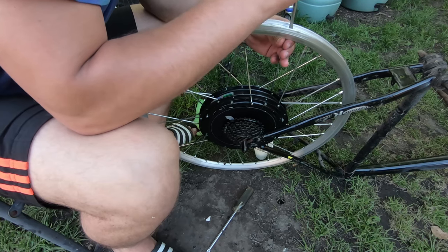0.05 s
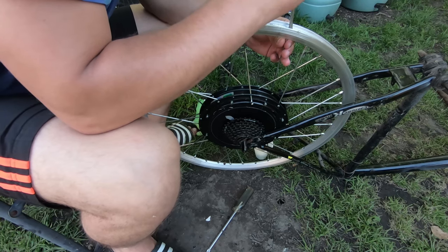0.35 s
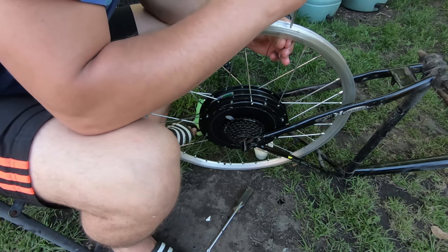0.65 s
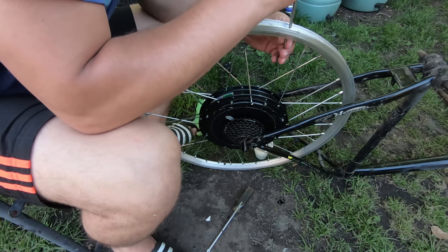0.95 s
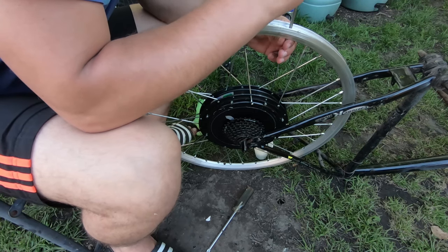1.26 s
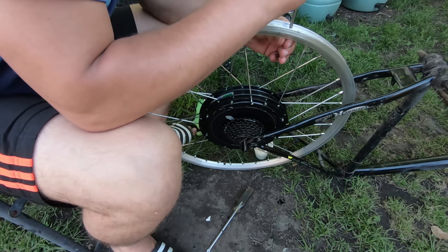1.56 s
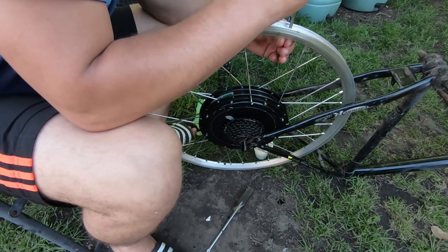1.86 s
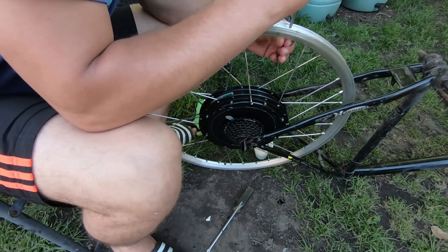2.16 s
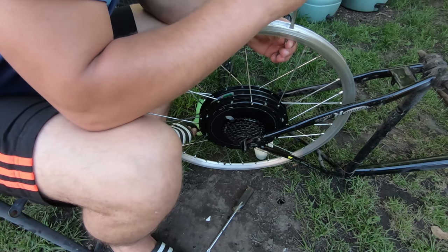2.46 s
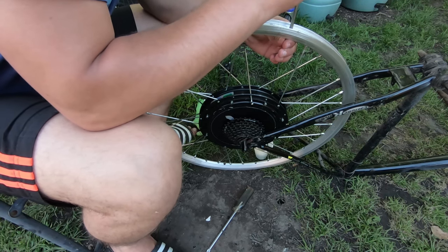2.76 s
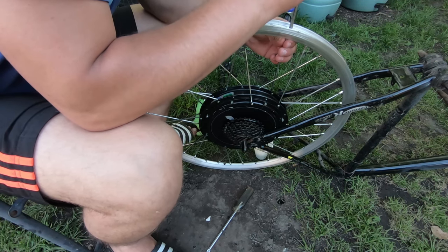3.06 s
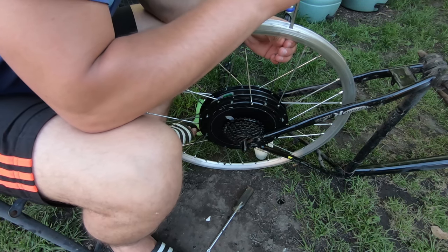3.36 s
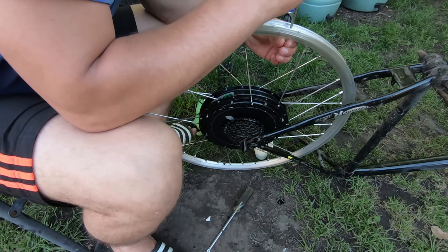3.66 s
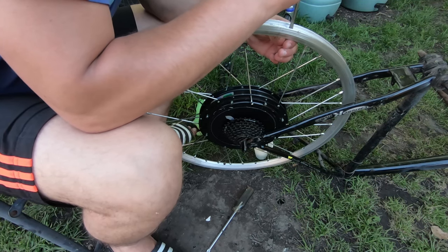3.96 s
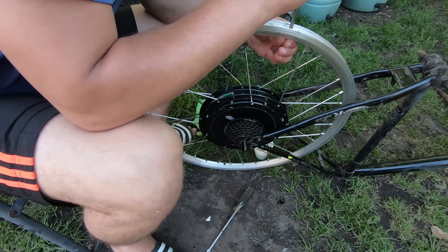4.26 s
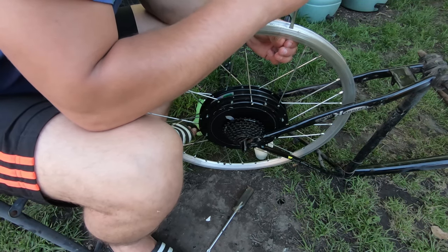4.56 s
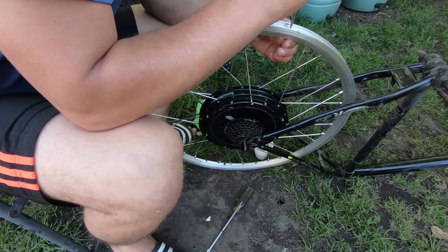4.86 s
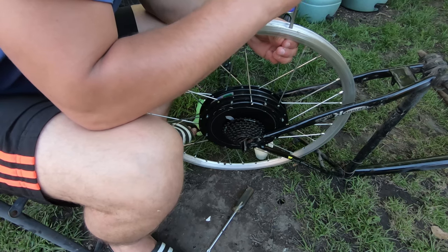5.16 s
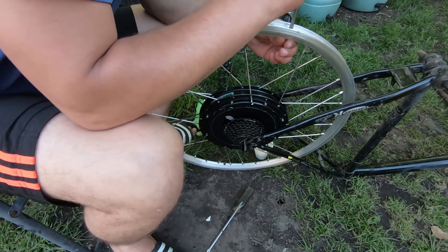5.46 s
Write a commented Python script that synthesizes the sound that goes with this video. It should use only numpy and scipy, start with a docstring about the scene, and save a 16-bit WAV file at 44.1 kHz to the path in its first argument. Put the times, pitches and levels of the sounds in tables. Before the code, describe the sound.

A low wind rumble runs throughout in a quiet garden, with soft buffets on the microphone, mostly in the first second and after 3 seconds, over very faint air hiss. A tool slips on a metal bicycle rim, giving light, irregular clicks that ring briefly, some paired with a tiny scrape between them. They fall around 0, 0.5, 0.9, 1.6 and 2.5 seconds. At 2.6 seconds comes one sharp, much louder snap with pinging spokes. Light clicks continue around 2.9, 3.3, 3.8, 4.4, 4.7 and 5.4 seconds. A nearby small bird gives three high, slightly falling whistles between 1 and 1.6 seconds, while another chirps faintly and raspily further off throughout. On the left a pigeon coos softly from 1.5 to 2.3 seconds, at 3.8, and from 4.6 to 5.4, answered by a fainter, lower one. A faint low hum swells and fades around 2 seconds.

```python
"""Bicycle wheel in a garden

A tool slips on the rim of a bicycle wheel: each slip excites the damped modes of rim and spokes as a
click, and between close clicks friction makes a rub. A small bird whistles nearby, another chirps further
off, and two pigeons coo to the left; their calls are frequency-modulated tones with garden echoes.
Under it all lie a low rumble with soft buffets of wind, a brief faint hum and the hiss of the air."""
import sys
import numpy as np
from scipy import signal
from scipy.fft import rfft, irfft, next_fast_len
from scipy.io import wavfile
from scipy.ndimage import uniform_filter1d

SR = 44100
rng = np.random.default_rng(int(sys.argv[2]) if len(sys.argv) > 2 else 0)


def digitize_waveform(pressure):
    """Quantize a signal to 16-bit integers and store it at the path in sys.argv[1].

    Rows of a 2-D input are taken as channels; values are limited to [-1, 1].
    """
    field = np.atleast_2d(pressure).T
    bounded = np.clip(field, -1, 1)
    quanta = np.round(bounded * 32767).astype(np.int16)
    wavfile.write(sys.argv[1], SR, quanta)


N = 242991
T = np.arange(N) / SR

# Levels in the tables are relative; each source applies its own gain.
# slips at the rim: (time [s], level [dB], treble [dB], rim ring boost [dB], middle ping boost [dB])
CLICKS = [(0.0024, -33.5, 8, 0, 2), (0.054, -49.5, -33.5, -20.5, 1.5), (0.4914, -36.5, -30, 2.5, 1),
          (0.5576, -32.5, -14, -0.5, 3.5), (0.839, -37, -21, -8, -0.5), (0.8924, -40.5, -42.5, -33, -12),
          (0.9189, -45.5, -32, 1, 2.5), (1.6172, -30, -15.5, -9.5, -1), (1.6612, -44, -40, -32, -7.5),
          (2.4693, -34, -42, -6.5, -1.5), (2.6289, -11, -7.5, -2, 0), (2.8827, -39.5, -26.5, -4, 2),
          (3.293, -33.5, -14.5, -2.5, 0), (3.776, -47.5, -48.5, -31, -3), (3.8186, -40, -34.5, -3.5, 0.5),
          (3.98, -48, -36, -16.5, -6.5), (4.333, -42.5, -55.5, -4.5, 8), (4.3678, -33, -31, -1, -4),
          (4.6045, -36, -17.5, -7.5, -1), (4.693, -52, -40, -15, -6), (4.7433, -33.5, -32, -2, 2),
          (5.1074, -42.5, -36, -20, -2.5), (5.4036, -35.5, -22, 4.5, 4.5), (5.442, -32, -20.5, 1, 1)]
# free modes of rim and spokes: (frequency [Hz], level [dB], time to decay by 60 dB [s])
WHEEL_MODES = [(810, -3, .15), (1265, 4.5, .08), (1390, -10, .06), (1810, 0, .09), (2024, -10, .06),
               (2335, -4, .09), (2437, -5, .08), (2730, -12, .08), (2918, -2, .12), (2968, -1, .09),
               (3440, -10, .13), (4068, -3, .18), (4656, -2, .12), (5292, -2, .15), (5890, -10, .2),
               (6525, -7, .13), (7300, -9, .15), (9105, -20, .08)]
# dense, quickly dying part of a click: (frequency [Hz], spectral level [dB])
CRACK_SPECTRUM = [(300, -30), (980, -27), (1300, 0), (2800, -1), (3700, -1), (5000, 3), (7400, 2.5),
                  (8400, -13), (10200, -15), (15000, -22)]
# the tool catching just before a slip: (time [s], level [dB])
CATCHES = [(0.49, -58), (0.5545, -51), (0.833, -62), (1.6135, -52), (3.287, -49.5), (5.4026, -47)]
# bird notes: kind -> (length [s], end pitch [ratio], glide exponent [1], opening scoop [share of pitch])
NOTE_SHAPES = {"whistle": (.1, .89, 1.2, .08), "rising coo": (.158, 1.075, 1.1, 0),
               "falling coo": (.235, .87, 3.2, 0), "lead-in": (0.073, 1.06, 0.96, 0.028),
               "short coo": (.085, .87, 1.1, .01), "far coo": (.2, .93, 1.2, 0.022)}
# near bird: (time [s], pitch [Hz], level [dB])
WHISTLES = [(1.004, 5580, -42.5), (1.244, 4600, -39), (1.47, 4570, -47.5)]
# far bird: (time [s], kind, level [dB])
CHIRPS = [(0.217, "high", -60), (0.999, "high", -62.5), (1.199, "low", -69.5), (1.927, "high", -64.5),
          (2.276, "low", -62.5), (2.953, "high", -65.5), (3.1, "low", -68), (3.539, "low", -77),
          (3.729, "high", -60.5), (4.361, "low", -64.5), (4.606, "high", -63.5), (4.64, "low", -64.5)]
# its high and low chirp: kind -> (opening pitch [Hz], centre of the rasp [Hz])
CHIRP_PITCHES = {"high": (5130, 4520), "low": (4020, 3750)}
# near pigeon: (time [s], kind, pitch [Hz], level [dB])
NEAR_COOS = [(1.525, "lead-in", 478.6, -59), (1.603, "short coo", 488, -42.5),
             (1.935, "rising coo", 480, -47.5), (2.075, "falling coo", 488, -47),
             (3.79, "short coo", 504, -50), (4.565, "lead-in", 515.6, -52),
             (4.655, "short coo", 532.6, -48), (4.968, "rising coo", 475, -46),
             (5.122, "falling coo", 497.2, -47)]
# far pigeon: (time [s], level [dB])
FAR_COOS = [(0.879, -65), (1.148, -60.5), (2.249, -63), (2.678, -61.5), (3.459, -58), (3.919, -61)]
# strength of the breeze: (time [s], deep rumble level [dB], upper rumble level [dB])
BREEZE = [(0, -38, -46), (.6, -39, -49), (.78, -45, -51), (1.08, -42, -46), (1.24, -45, -54),
          (1.42, -40, -54), (1.7, -44, -55), (2.25, -40, -51), (2.43, -49, -59), (2.72, -41, -51),
          (3.12, -46, -56), (3.3, -41, -47), (3.88, -49, -59), (4.15, -41, -46), (4.45, -42, -46),
          (4.56, -44, -52), (4.9, -46, -52), (5.25, -40, -50)]
# strongest wind buffets: (time [s], level [dB])
BUFFETS = [(0.223, -33.5), (0.459, -31.5), (.55, -36), (0.699, -28.5), (0.919, -30.5), (1.054, -32),
           (1.118, -31.5), (2.194, -31), (3.052, -35.5), (3.241, -31.5), (3.469, -33), (4.112, -31),
           (4.459, -27.5), (4.744, -27.5), (5.35, -31)]
# deep wind rumble: (frequency [Hz], spectral level [dB])
DEEP_SPECTRUM = [(15, -4), (28, 10.5), (50, 19.5), (65, 16), (90, 17), (115, 3.5), (160, -79)]
# upper wind rumble: (frequency [Hz], spectral level [dB])
UPPER_SPECTRUM = [(80, -33.5), (115, 0), (170, -2), (205, -11), (240, -22), (320, -28), (700, -75.5)]
# still garden air: (frequency [Hz], spectral level [dB])
AIR_SPECTRUM = [(400, 0), (600, -7), (1400, -13), (2500, -21), (5000, -22), (6800, -19), (8200, -29),
                (15000, -44)]

MODE_SCATTER_DB = 1.9   # each point of contact favours other modes


def wheel(level_db=-18, echo_db=-5.5):
    """Stick-slip friction: rubs, catches and clicks add to their reflections from paving and fence."""
    out = rubbing(wheel_spectrum(rim_db=-3, ping_db=4.5)) + catches()
    for s, click_db, *touch in CLICKS:
        sound, lead_s = click(click_db, *touch)
        early = max(round((lead_s - s) * SR), 0)
        add(out, s - lead_s, from_db(click_db + level_db) * sound[:, early:])
    return out + from_db(echo_db) * garden_echoes(out, t60=.2, alike=.14, delay_s=.016)


def click(level_db, treble_db, rim_db, ping_db, lead_s=.008, usual_slip_s=.0042, snap_db=-22):
    """Impulse excitation: the metal scrapes, slips in a gritty burst and rings in damped modes."""
    t = T[:SR // 4] - lead_s
    after = np.maximum(t, 0)
    slip_s = usual_slip_s * 2 ** ((-39.5 - level_db) / 33.5)   # lighter touches drag on longer
    hz, mode_db, t60 = np.transpose(WHEEL_MODES)[:, :, None]
    phase = rng.uniform(0, 2 * np.pi, hz.shape) + .88 * rng.standard_normal((2, *hz.shape))
    spectrum = wheel_spectrum(rim_db, ping_db)
    scatter_db = MODE_SCATTER_DB * rng.standard_normal(hz.shape)
    strength = from_db(mode_db + contact_db(hz, rim_db, ping_db) + scatter_db)
    # hand and tool damp the treble most; only a hard snap shakes the spokes free
    loss_db_per_s = 60 / t60 + (level_db < snap_db) * .1 * hz
    modes = strength * from_db(-loss_db_per_s * after) * np.sin(2 * np.pi * hz * t + phase)
    crack = from_db(-60 * after / .1) * noise(spectrum, alike=.21, size=len(t))
    build_up = np.minimum(after / slip_s, 1)   # the ringing grows while the slip lasts
    slip = after / slip_s * np.exp(1 - after / slip_s)
    scrape = from_db(-9) * (slip_s / usual_slip_s) ** 2 * (t < 0) * (1 + t / lead_s)
    grit = from_db(3.1 * drift(1200, size=len(t))) * noise(spectrum, alike=.76, size=len(t))
    burst = from_db(3) * usual_slip_s / slip_s * (slip + scrape) * grit   # quicker slips are sharper
    return soften(build_up * (modes.sum(axis=1) + crack) + burst, treble_db), lead_s


def soften(sound, treble_db, hard_hz=15000, db_per_octave=18.5):
    """Band limiting: a soft contact excites little treble, and thin metal radiates little bass."""
    sound = butter(sound, hard_hz * 2 ** (treble_db / db_per_octave), "low", order=4)
    sound = butter(sound, 1080, "high", order=4)
    return sound / np.std(sound[:, :SR // 40])   # rms 1 over the first 25 ms


def wheel_spectrum(rim_db, ping_db, width_hz=40):
    """Resonance: the wheel's strong modes stand as peaks above a dense bed of weaker ones."""
    hz = np.geomspace(300, 15000, 1500)
    mode_hz, mode_db, _ = np.transpose(WHEEL_MODES)[:, :, None]
    mode_db = mode_db + MODE_SCATTER_DB * rng.standard_normal(mode_db.shape)
    peaks = np.sum(from_db(mode_db) ** 2 / (1 + (2 * (hz - mode_hz) / width_hz) ** 2), axis=0)
    bed = from_db(np.interp(hz, *np.transpose(CRACK_SPECTRUM)) - 15) ** 2
    power = peaks * np.minimum(hz / 1200, 1) ** 4 + bed
    return np.column_stack([hz, 10 * np.log10(power) + contact_db(hz, rim_db, ping_db)])


def contact_db(hz, rim_db, ping_db, rim_below_hz=1960, ping_hz=3230):
    """Modal coupling: where the tool bears sets the share of low rim ring and of middle ping."""
    return rim_db / (1 + (hz / rim_below_hz) ** 8) + ping_db / (1 + (5 * np.log(hz / ping_hz)) ** 4)


def rubbing(spectrum, level_db=-29.5, grain_db=5, dull_hz=4500, max_gap_s=.06, margin_s=.011):
    """Sliding friction: between close clicks the tool stays on the metal and drives it unevenly."""
    strokes = np.zeros(N)
    for (s, db, *_), (next_s, next_db, *_) in zip(CLICKS, CLICKS[1:]):
        if next_s - s < max_gap_s:
            firmness = from_db((db + next_db) / 2 + level_db)
            strokes += firmness * arch(s - margin_s, next_s - s + 2 * margin_s)
    grain = from_db(grain_db * drift(130))
    friction = butter(noise(spectrum, alike=.36), dull_hz, "low", order=4)
    return strokes * rms_one(grain * friction)


def catches(rise_s=.0013, band_hz=(2200, 8000)):
    """Weak transients: the tool catches in ticks too light and short to set the wheel ringing."""
    out, t = np.zeros((2, N)), T[:SR // 50]
    envelope = (t / rise_s * np.exp(1 - t / rise_s)) ** 2
    for s, db in CATCHES:
        tick = rms_one(butter(noise(CRACK_SPECTRUM, alike=.88, size=len(t)), band_hz, "band", order=3))
        add(out, s - rise_s, from_db(db) * tick * envelope)
    return out


def small_birds():
    """Direct and reflected sound: a near bird whistles, and a far one arrives mostly as echo."""
    notes = [(s, "whistle", hz, db) for s, hz, db in WHISTLES]
    near = song(notes, waver=.004, waver_hz=200, overtone_db=-40, softness=1.4, late=.8)
    far = chirps()
    near_echo = garden_echoes(near, t60=.32, alike=.59, delay_s=.0037)
    far_echo = garden_echoes(far, t60=.26, alike=.62, delay_s=.0027)
    return from_db(-9.5) * near + from_db(-4.5) * near_echo + from_db(-12) * far + far_echo


def song(notes, waver, waver_hz, overtone_db, softness, late):
    """Gliding oscillation: each nearly pure note swells and fades as its pitch grows less steady."""
    out, unsteady = np.zeros(N), waver * drift(waver_hz)
    for s, kind, pitch_hz, db in notes:
        length_s, glide, bend, scoop = NOTE_SHAPES[kind]
        progress = np.linspace(0, 1, round(length_s * SR))
        hz = pitch_hz * (1 + (glide - 1) * progress ** bend) * (1 - scoop * np.exp(-8 * progress))
        wobble = 1 + progress ** .41 * unsteady[round(s * SR):][:len(progress)]
        phase = 2 * np.pi * np.cumsum(hz * wobble) / SR
        swell = rms_one(np.abs(np.sin(np.pi * progress ** late)) ** softness)
        tone = np.sqrt(2) * (np.sin(phase) + from_db(overtone_db) * np.sin(2 * phase))
        add(out, s, from_db(db) * swell * tone)
    return out


def chirps(length_s=.18, hold_s=.022, break_s=.075, shake_hz=330, spread_hz=640):
    """Frequency modulation: a clear note drops into a rasp as its pitch shakes fast and wide."""
    out, t = np.zeros(N), T[:round(length_s * SR)]
    shake = np.tanh(drift(shake_hz))
    rasp = np.clip((t - hold_s) / break_s, 0, 1)
    swell = np.abs(np.sin(np.pi * (t / length_s) ** .65)) ** .8
    for s, kind, db in CHIRPS:
        opening_hz, centre_hz = CHIRP_PITCHES[kind]
        hz = opening_hz + rasp * (centre_hz - opening_hz + spread_hz * shake[round(s * SR):][:len(t)])
        add(out, s, from_db(db) * rms_one(swell * np.sin(2 * np.pi * np.cumsum(hz) / SR)))
    return out


def pigeons(near_db=-6.5, far_db=-6, echo_db=-6.5, far_hz=413.6):
    """Reverberation blurs the coos of two birds that answer each other across the gardens."""
    far_coos = [(s, "far coo", far_hz, db) for s, db in FAR_COOS]
    near = pigeon(NEAR_COOS, waver=.008, husk_db=-12, left_db=14.5, lag_s=.00012)
    far = pigeon(far_coos, waver=.06, husk_db=-19, left_db=13.5, lag_s=.0001)
    both = from_db(near_db) * near + from_db(far_db) * far
    return both + from_db(echo_db) * garden_echoes(both.mean(axis=0), t60=.6, alike=.94, delay_s=.027)


def pigeon(coos, waver, husk_db, left_db, lag_s, flutter_db=1.8):
    """Interaural differences: a wavering, husky hoot reaches the left ear sooner and louder."""
    hoot = song(coos, waver, waver_hz=30.4, overtone_db=-65.5, softness=1.2, late=.7)
    hoot *= from_db(flutter_db * drift(36))
    envelope = np.abs(signal.hilbert(hoot))
    husk = noise([(150, -36.5), (290, -16.5), (420, -1), (520, -10), (750, -31), (1500, -67.5)], .33)
    at_ears = np.array([hoot, np.interp(T - lag_s, T, hoot)])
    return pan(at_ears + from_db(husk_db) * envelope * husk, left_db)


def garden_echoes(x, t60, alike, delay_s):
    """Diffuse reflection: fences, walls and leaves return an exponentially decaying tail."""
    t = T[:SR]
    scatter = noise([(100, -14), (5000, -9), (15000, -.5)], alike, size=SR)
    response = scatter * from_db(-60 * t / t60) * (t > delay_s)
    response /= np.sqrt(np.sum(response ** 2) / 2)
    return signal.fftconvolve(np.atleast_2d(x), response, axes=1)[:, :N]


def wind(lump_db=5, buffet_s=.035, upper_buffet_db=-19.5):
    """Turbulence: a breeze rumbles in random lumps, and stronger buffets add to it in power."""
    times, *levels = np.transpose(BREEZE)
    breeze_db = np.array([np.interp(T, times, db) for db in levels])
    deep_breeze, upper_breeze = from_db(breeze_db + lump_db * drift(8.1))
    buffets = sum(from_db(db) * np.exp(-np.minimum(np.abs(T - s) / buffet_s, 10) ** 2)
                  for s, db in BUFFETS)
    deep = even(noise(DEEP_SPECTRUM, alike=.91), window_s=.043)
    upper = even(noise(UPPER_SPECTRUM, alike=.73), window_s=.025)
    return (np.hypot(deep_breeze, buffets) * deep
            + np.hypot(upper_breeze, from_db(upper_buffet_db) * buffets) * upper)


def hum(pitch_hz=192.3, level_db=-49):
    """Amplitude modulation: a faint, slightly wavering tone swells and fades once."""
    phase = 2 * np.pi * np.cumsum(pitch_hz * (1 + .012 * drift(23))) / SR
    return from_db(level_db) * arch(start_s=1.69, length_s=.642) * np.sqrt(2) * np.sin(phase)


def air(level_db=-72):
    """Stationary noise: the faint hiss of still garden air."""
    return from_db(level_db) * noise(AIR_SPECTRUM, alike=.12)


def noise(spectrum, alike, size=N):
    """Spectral shaping: stereo noise of rms 1, its two sides correlated by `alike`."""
    points, n = np.array(spectrum), next_fast_len(size)
    hz = np.maximum(np.fft.rfftfreq(n, 1 / SR), 1)
    gain = from_db(np.interp(np.log(hz), np.log(points[:, 0]), points[:, 1]))
    mid, side = irfft(rfft(rng.standard_normal((2, n))) * gain, n)[:, :size]
    return rms_one(np.sqrt(1 + alike) * mid + np.sqrt(1 - alike) * side * [[1], [-1]])


def drift(rate_hz, size=N):
    """Random fluctuation: low-passed noise with an rms near 1."""
    hz = np.fft.rfftfreq(2 ** 18, 1 / SR)
    white = rfft(rng.standard_normal(2 ** 18))
    return rms_one(irfft(white / (1 + (hz / rate_hz) ** 4)))[:size]


def even(x, window_s):
    """Division by the running rms takes the slow swells out of noise."""
    return x / np.sqrt(uniform_filter1d(np.mean(x ** 2, axis=0), round(window_s * SR)) + 1e-6)


def arch(start_s, length_s):
    """A semi-elliptical envelope from silence to 1 and back."""
    return np.sqrt(np.maximum(1 - (2 * (T - start_s) / length_s - 1) ** 2, 0))


def butter(x, hz, kind, order):
    """Filtering with a maximally flat passband."""
    return signal.sosfilt(signal.butter(order, np.minimum(hz, .45 * SR), kind, fs=SR, output="sos"), x)


def pan(x, left_db):
    """A level difference between the ears gives direction."""
    return x * from_db([[left_db / 2], [-left_db / 2]])


def add(out, s, sound):
    """Superposition of a sound from time s on."""
    i = max(round(s * SR), 0)
    out[..., i:i + sound.shape[-1]] += sound[..., :max(N - i, 0)]


def from_db(db):
    """The amplitude ratio of a level."""
    return 10 ** (np.asarray(db) / 20)


def rms_one(x):
    """Normalisation to unit power."""
    return x / np.sqrt(np.mean(x ** 2) + 1e-20)


def scene():
    """Superposition: the pressures of wheel, birds and background add."""
    return wheel() + small_birds() + pigeons() + pan(wind() + hum(), left_db=3.3) + air()


def record(dry, stopband_hz=15200):
    """Band limiting: a steep low-pass filter removes the highest treble."""
    return signal.sosfilt(signal.cheby2(12, 60, stopband_hz, fs=SR, output="sos"), dry)


dry = scene()
out = record(dry)
digitize_waveform(out)
```